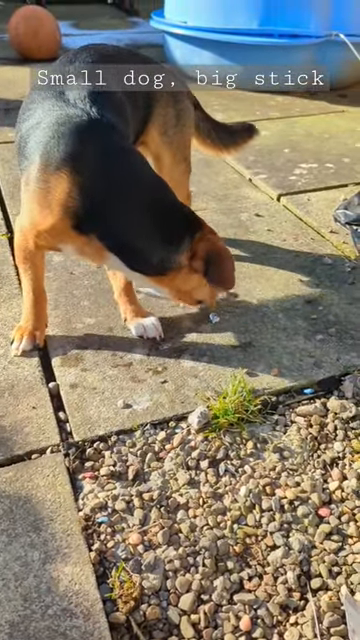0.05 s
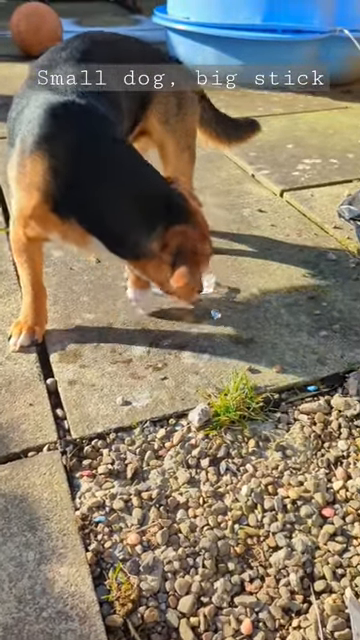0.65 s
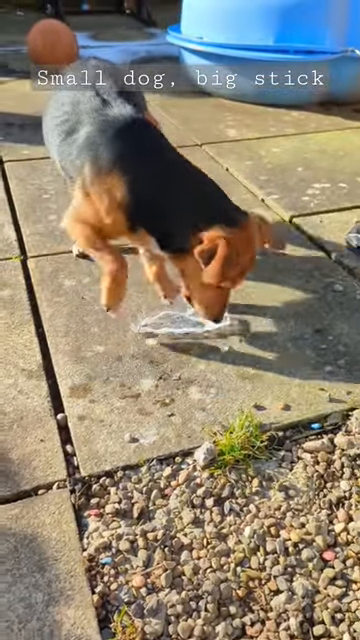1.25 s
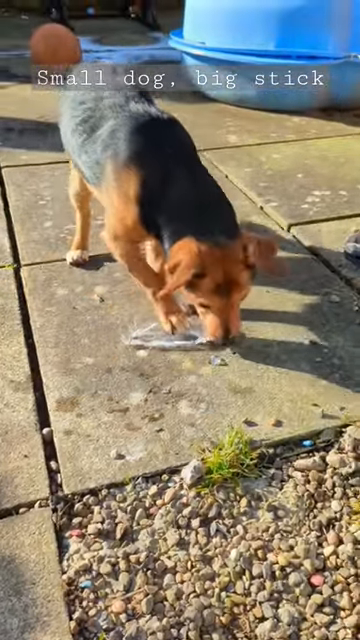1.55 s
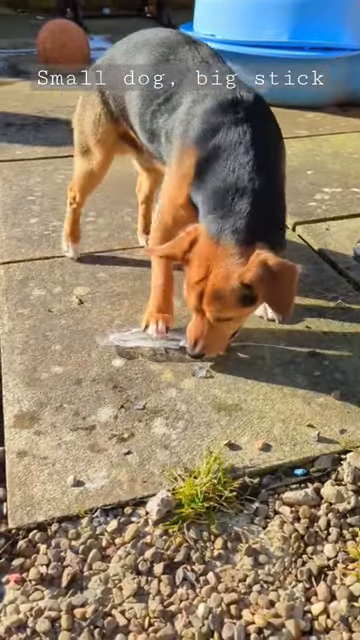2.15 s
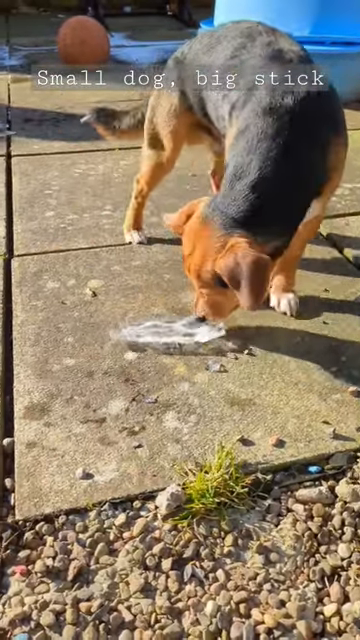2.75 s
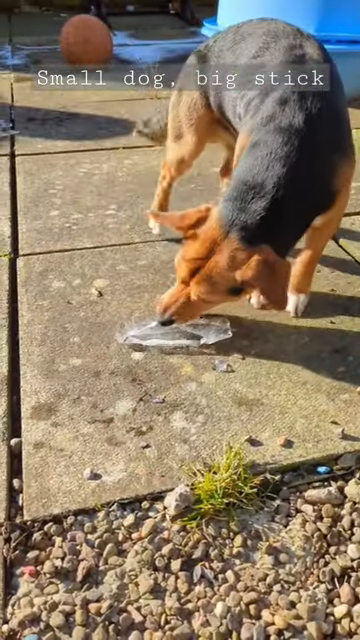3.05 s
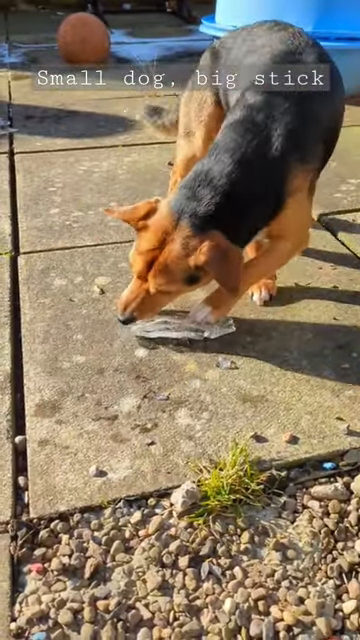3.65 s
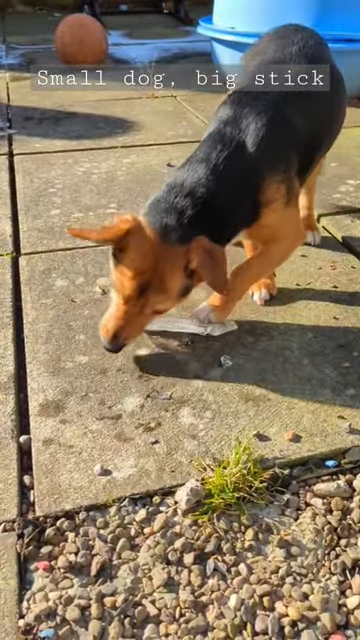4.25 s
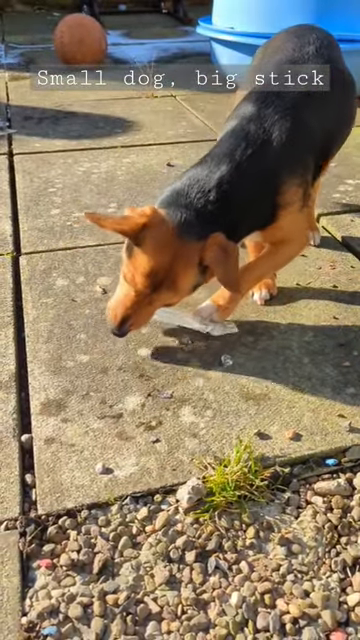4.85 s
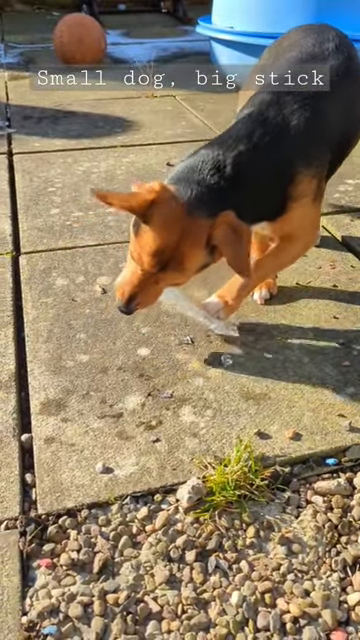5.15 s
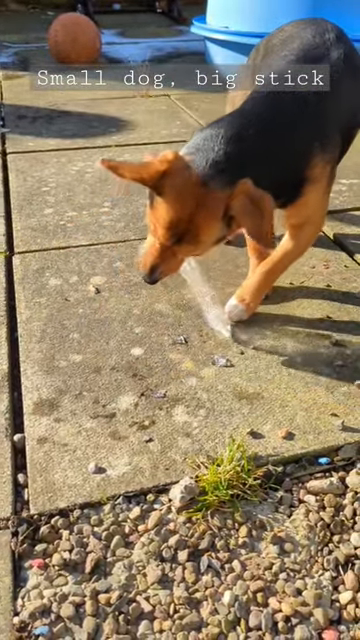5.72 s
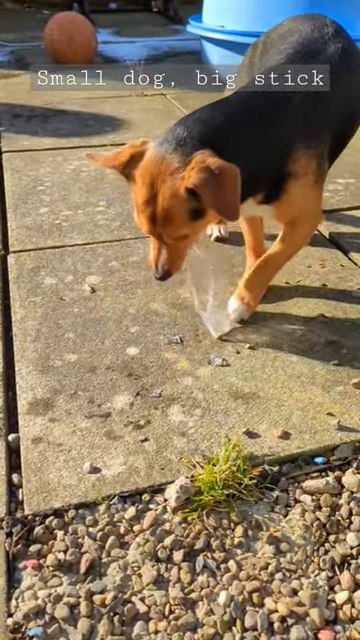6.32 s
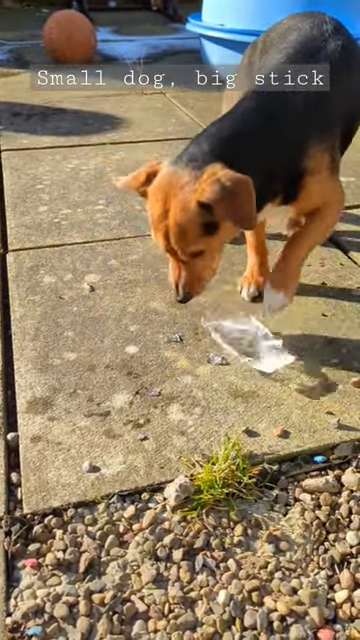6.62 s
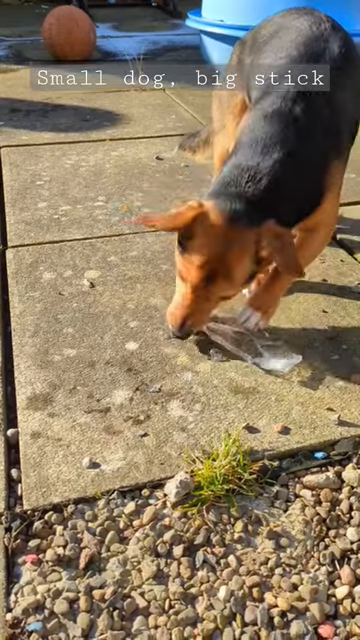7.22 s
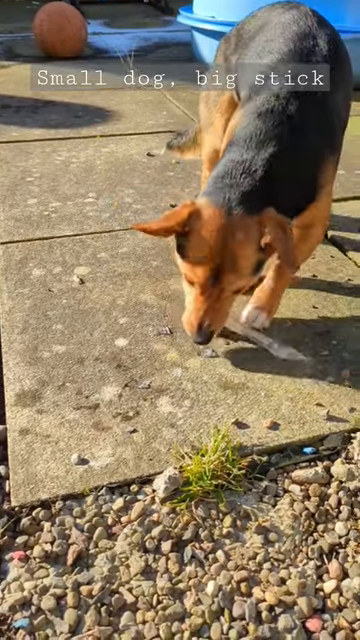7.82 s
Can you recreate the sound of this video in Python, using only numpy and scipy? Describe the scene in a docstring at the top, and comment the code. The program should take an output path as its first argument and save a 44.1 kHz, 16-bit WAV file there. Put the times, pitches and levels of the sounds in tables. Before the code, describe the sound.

A small dog paws a piece of ice across outdoor paving, making close gritty scrapes, brief squeaks and sharp ticks of claws and teeth. The ice topples and clinks to rest twice, once early and again, louder, near the end. Between the two come a few soft thumps of wind on the microphone and light gnawing. Faint bird whistles and a far engine's hum lie behind, the hum dropping away midway.

```python
"""A slab of ice on concrete paving, nosed and pawed by a small dog close to a stereo microphone.
The slab grates over grit, squeaks and twice tips over and clinks to rest, ringing in its own modes;
claws and teeth tick on it. Wind or handling makes soft low bumps, mostly on the left.
Far off an engine drones in rumble and hiss, a background that is turned down in the middle
and comes back; a bird whistles faintly."""
import sys
import numpy as np
from scipy import signal
from scipy.fft import rfft, irfft
from scipy.io import wavfile

SR = 44100
rng = np.random.default_rng(int(sys.argv[2]) if len(sys.argv) > 2 else 0)


def persist_wave(psi):
    """Save psi, clipped to +-1, as 16-bit WAV."""
    counts = np.round(np.clip(psi, -1, 1) * 32767).astype(np.int16)
    wavfile.write(sys.argv[1], SR, np.atleast_2d(counts).T)


N = 347508
T = np.arange(N) / SR


def amp(db):
    """Decibels to gain."""
    return 10 ** (np.asarray(db) / 20)


def unit(x):
    """Scales to rms 1."""
    return x / np.sqrt(np.mean(x ** 2) + 1e-20)


def read(points, hz):
    """Reads a table on a log-frequency axis."""
    f, value = np.transpose(points)
    return np.interp(np.log(hz + 1), np.log(f + 1), value)


def add(mix, s, sound):
    """Mixes a sound in at time s."""
    part = mix[..., max(round(s * SR), 0):][..., :sound.shape[-1]]
    part += sound[..., :part.shape[-1]]


def colour(x, points):
    """Filters by a spectrum, keeping the power of white noise."""
    size = x.shape[-1]
    return irfft(rfft(x) * unit(amp(read(points, np.fft.rfftfreq(size, 1 / SR)))), size)


def drift(hz):
    """A random wander of rms 1, with changes up to about hz."""
    f = np.fft.rfftfreq(N, 1 / SR)
    return unit(irfft(rfft(rng.standard_normal(N)) / (1 + (f / hz) ** 4), N))


def pair(mid, side, width):
    """Left and right from a shared part and a part of opposite sign."""
    return np.array([mid + width * side, mid - width * side]) / np.sqrt(1 + width ** 2)


def noise(size, width):
    """Stereo white noise: mono at width 0, independent sides at 1."""
    return pair(*rng.standard_normal((2, size)), width)


def pan(left_db):
    """Channel gains that put the left left_db above the right."""
    return amp([[left_db / 2], [-left_db / 2]])


# Level of the background (drone, rumble, part of the hiss), turned down in the middle,
# probably by noise suppression: (time [s], level [dB])
BACKGROUND_LEVEL = [(0.0, -42.5), (1.76, -42.5), (2.83, -60.5), (4.59, -66.5), (6.19, -62), (6.41, -44.5),
                    (7.88, -43.5)]
# The far engine's speed: (time [s], cycle rate [Hz])
ENGINE_SPEED = [(0, 17.5), (2, 16.5), (5, 16.5), (7.88, 17)]
# Its harmonics: (multiple of the cycle rate, level [dB])
ENGINE_HARMONICS = [(3, -12.5), (4, 0.5), (6, -10), (7, -11.5), (8, -14), (10, -19), (11, -8), (13, -21),
                    (15, -21.5), (20, -19.5), (28, -23), (36, -23)]
# The rumble around it: (frequency [Hz], level [dB])
RUMBLE_SPECTRUM = [(20, -27), (35, -18.5), (48, -6.5), (70, 0), (130, -0.5), (190, -4), (260, -5.5),
                   (400, -12.5), (700, -17.5), (1500, -67)]


def far_engine(drone_db=-2, rumble_db=-48.5, rumble_follow=.85, loud_db=-42):
    """Far off, an engine's cycles make wavering harmonics in a rumble; both follow the background level."""
    level_db = np.interp(T, *np.transpose(BACKGROUND_LEVEL))
    cycle_hz = np.interp(T, *np.transpose(ENGINE_SPEED)) * (1 + .0069 * drift(6.04))
    cycles = np.cumsum(cycle_hz) / SR
    drone = sum(amp(db + 2.2 * drift(23)) * np.sin(2 * np.pi * (k * cycles + rng.random()))
                for k, db in ENGINE_HARMONICS)
    drone = pair(drone, drone * drift(12), width=.17)  # moving air shifts it from side to side
    rumble = colour(noise(N, width=.28), RUMBLE_SPECTRUM) * amp(1.26 * drift(8))
    rumble *= amp(rumble_db + rumble_follow * (level_db - loud_db))
    return np.sqrt(2) * amp(drone_db + level_db) * drone + rumble


# Open air all around the microphone: (frequency [Hz], level [dB])
AIR_SPECTRUM = [(100, -22.5), (400, 0), (620, -7), (780, -2.5), (1100, -0.5), (1380, 1.5), (1520, 3.5),
                (1680, 4.5), (1900, 0.5), (2100, 1.5), (2900, -9.5), (4500, -14), (6500, -19),
                (9000, -28.5), (15000, -35.5), (16300, -47)]


def outdoor_hiss(calm_db=-61, roar_db=-56, loud_db=-42):
    """A wide, soft hiss, and a duller one that follows the background level."""
    calm = colour(noise(N, width=.95), AIR_SPECTRUM) * amp(.8 * drift(18))
    roar = colour(colour(noise(N, width=1), AIR_SPECTRUM), [(2200, .0069), (6000, -4)])
    sunk_db = np.interp(T, *np.transpose(BACKGROUND_LEVEL)) - loud_db
    return amp(calm_db) * calm + amp(roar_db + sunk_db) * roar


# The free slab's modes, the first four bending it lengthwise: (frequency [Hz], t60 [s], level [dB])
SLAB_MODES = [(1373, 0.15, -.5), (2178, 0.15, -12.5), (3595, 0.098, -13), (4750, 0.044, -1),
              (5170, 0.039, -18), (6290, 0.041, -15.5), (6970, .045, -9), (7470, 0.028, -15),
              (9150, 0.033, -14.5), (10270, 0.042, -16), (12400, 0.037, -14), (14530, 0.021, -7.5)]


def through_ice(force, ring, share):
    """Blends a contact force with the ringing it wakes in the slab; ring scales the decay times."""
    t = np.arange(4096) / SR
    body = sum(amp(.5 * db - 60 * t / (t60 * ring)) * np.cos(2 * np.pi * hz * t) / np.sqrt(t60)
               for hz, t60, db in SLAB_MODES)
    rung = signal.oaconvolve(force, body[None] / np.linalg.norm(body), axes=1)[:, :N]
    return np.sqrt(1 - share) * force + np.sqrt(share) * rung


def high_resonances(ring_db, t60=.03, count=14):
    """A direct click followed by faint ringing at random high pitches."""
    t = np.arange(4096) / SR
    hz = rng.uniform(5000, 15500, (count, 1))
    rings = (np.sin(2 * np.pi * (hz * t + rng.random((count, 1)))) * amp(-60 * t / t60)).sum(0)
    response = (t == 0) + amp(ring_db) * rings / np.linalg.norm(rings)
    return response[None] / np.linalg.norm(response)


def shifting_resonances(x, ring_db, sets=4):
    """Faint, random high resonances colour the ticks and grit, one set fading into another."""
    weights = np.array([amp(20 * drift(9)) for _ in range(sets)])
    return sum(signal.oaconvolve(x * share, high_resonances(ring_db), axes=1)[:, :N]
               for share in weights / weights.sum(0))


def grains(per_s, spread_db, judder_db):
    """Rough points catch and let go: random clicks of uneven size, in clumps."""
    sizes = amp(spread_db * np.minimum(rng.exponential(1, N), 4))
    catches = rng.random(N) < per_s / SR
    return unit(sizes * catches * noise(N, width=.86) * amp(judder_db * drift(90)))


# Ice and claws dragged over the concrete, close by:
# (time of hardest push [s], length [s], grating level [dB], grit against grating [dB])
STROKES = [(.11, 0.23, -67.5, -17), (.66, .12, -69.5, -20), (0.726, 0.075, -67, 13.5),
           (1.036, 0.27, -64, -2), (1.14, 0.15, -48.5, -9), (1.273, 0.12, -50.5, 0),
           (1.364, 0.44, -60, -6.5), (1.635, 0.046, -57.5, 7), (1.84, 0.56, -65, -7),
           (1.948, 0.062, -70, 14), (2.236, 0.3, -67.5, -4), (2.477, 0.083, -70, 9), (2.537, .18, -66, -5),
           (2.749, .1, -71.5, 6.5), (2.88, 0.32, -67, -4.5), (3.672, 0.15, -68.5, -1.5),
           (3.89, 0.12, -75, 5), (4.65, 0.64, -73.5, 3), (4.98, 0.098, -69, 10.5), (5.072, 0.081, -74, 10),
           (5.208, 0.4, -73.5, 4.5), (5.503, 0.17, -72, 14), (5.883, 0.92, -76.5, -1),
           (6.2, 0.67, -71.5, -3), (6.506, 0.09, -52, -.5), (6.579, 0.092, -46.5, 1),
           (6.684, 0.27, -50.5, -4.5), (6.903, 0.14, -58, -2), (7.065, 0.22, -73, 6.5),
           (7.868, 0.51, -55, -1)]
# The grating slab: (frequency [Hz], level [dB])
GRATE_SPECTRUM = [(300, -14.5), (700, 1.5), (1150, 0.5), (1700, -13), (2300, 1), (2900, -3), (3700, -1.5),
                  (5000, -3.5), (7000, -7.5), (8200, -15), (16000, -34)]
# The grit under it: (frequency [Hz], level [dB])
GRIT_SPECTRUM = [(2000, -40), (4200, -7), (5500, 8), (7200, 0.5), (8300, 0), (10500, -2), (14800, -5.5),
                 (16300, -15)]


def scrapes(grate_db=2, crackle_db=-4, swell_share=.4):
    """Each stroke swells and fades; the slab grates, fine grit hisses and coarse grit crackles."""
    slab_push, grit_push = np.zeros((2, N))
    for peak_s, length, slab_db, grit_db in STROKES:
        t, swell_s = np.arange(0, length, 1 / SR), swell_share * length
        push = amp(np.interp(t, [0, swell_s, length], [-12, 2, -12])) * signal.windows.tukey(len(t), .3)
        add(slab_push, peak_s - swell_s, amp(slab_db) * push)
        add(grit_push, peak_s - swell_s, amp(slab_db + grit_db) * push)
    slips = slab_push * grains(per_s=5500, spread_db=-.5, judder_db=4.5)
    slab = through_ice(slips, ring=.55, share=.36)
    fine = grains(per_s=20000, spread_db=2, judder_db=2.2)
    coarse = grains(per_s=290, spread_db=3, judder_db=8)
    grit = shifting_resonances(grit_push * (fine + amp(crackle_db) * coarse), ring_db=-6)
    return amp(grate_db) * colour(slab, GRATE_SPECTRUM) + colour(grit, GRIT_SPECTRUM)


# A bird far off, in the centre: (start [s], length [s], middle pitch [Hz])
BIRD_WHISTLES = [(.02, .14, 4770), (.22, 0.055, 4560), (0.646, .09, 4020), (2.708, .07, 4350),
                 (2.87, 0.05, 5000), (3.39, 0.092, 5530)]


def far_bird(level_db=-74, sag_hz_per_s=900, waver=.025):
    """Thin whistles that sag in pitch, blurred by distance."""
    out, wobble = np.zeros(N), 1 + waver * drift(220)
    for start, length, hz in BIRD_WHISTLES:
        t = np.arange(0, length, 1 / SR)
        pitch = (hz - sag_hz_per_s * (t - length / 2)) * wobble[round(start * SR):][:len(t)]
        add(out, start, signal.windows.tukey(len(t), .5) * np.sin(2 * np.pi * np.cumsum(pitch) / SR))
    return amp(level_db) * out


# Claws and teeth on the ice, close by: (time [s], level [dB], treble tilt [dB])
SNAPS = [(0.078, -48, -31), (.2044, -53, -9), (0.634, -50.5, -25), (0.7777, -41, -6), (.9256, -37, -17),
         (1.0186, -38.5, -48), (1.151, -30.5, 0), (1.8644, -45, -6), (1.9445, -53, -2), (2.13, -49, -3),
         (2.4573, -39, 18), (2.5012, -44, -2), (2.569, -38, 4), (2.7583, -39.5, -2), (3.397, -50, -2),
         (3.645, -39, 7), (4.0956, -39, -12), (4.629, -34, 16), (4.8456, -46, 2), (4.955, -34, 3),
         (4.97, -40, -5), (5.0405, -30.5, -2), (5.1697, -43, 8), (5.3007, -47.5, -6), (5.49, -32.5, 14),
         (5.614, -48, 1), (5.7646, -44.5, -7), (5.851, -41.5, -4), (5.8845, -45, 6), (5.946, -43.5, -1),
         (5.9786, -39, -9), (6.0103, -44.5, -3), (6.117, -45, 3), (6.1932, -41.5, 8), (6.325, -40.5, 1),
         (6.4525, -40, -9), (6.658, -24, 13), (6.676, -23, 7), (6.9566, -41, 4), (7.06, -35.5, 5),
         (7.6304, -41.5, -9)]
# The colour they share: (frequency [Hz], level [dB])
SNAP_SPECTRUM = [(1000, -32), (2800, -10), (4000, 0), (5300, 1.5), (7000, 4.5), (8200, -0.5), (10000, -3),
                 (14500, -13), (16300, -18)]


def claws_and_teeth(level_db=-3, centre_hz=5230, spread_oct=.16, skid_db=-8, skid_s=.013,
                    rise_s=.00084, snap_s=.0019, crumble_db=-15, crumble_s=.0063,
                    gnaw_start=5.5, gnaw_s=1.5, gnaws=20):
    """A hard point snaps on the ice at its own pitch, skids and catches once more, more softly."""
    t, out = np.arange(SR // 16) / SR, np.zeros((2, N))
    envelope = (1 - np.exp(-t / rise_s)) * (np.exp(-t / snap_s) + amp(crumble_db) * np.exp(-t / crumble_s))
    gnawing = [(gnaw_start + gnaw_s * (i + rng.random()) / gnaws, rng.normal(-47.5, 1), 6)
               for i in range(gnaws)]
    for s, db, treble_db in SNAPS + gnawing:
        hz = centre_hz * 2 ** (spread_oct * rng.standard_normal())
        for delay, drop_db in [(0, 0), (skid_s * rng.uniform(.28, 1), skid_db)]:
            snap = colour(noise(len(t), width=.39), [(5000, 0), (12000, treble_db)])
            pitched = colour(snap, [(hz / 1.15, 0), (hz, 5), (hz * 1.15, 0)])
            add(out, s + delay, amp(db + drop_db) * envelope * pitched)
    rung = shifting_resonances(through_ice(out, ring=.35, share=.06), ring_db=-9)
    return amp(level_db) * colour(rung, SNAP_SPECTRUM)


def knock(start=.078, level_db=-40, hz=1050, t60=.05):
    """One dull knock close by: a single damped mode."""
    t = np.maximum(T - start, 0)
    return amp(level_db - 60 * t / t60) * np.sin(2 * np.pi * hz * t)


# Drags on the paving that sing roughly: (start [s], end [s], resonance [Hz], level [dB])
SINGING_DRAGS = [(.71, 0.786, 5500, -69), (1.278, 1.305, 4750, -54), (2.457, 2.587, 6950, -57),
                 (3.636, 3.682, 6870, -55.5), (5.469, 5.567, 5100, -52.5), (6.105, 6.52, 6940, -67.5),
                 (6.494, 6.618, 1150, -45.5), (6.567, 6.727, 3750, -48), (7.017, 7.145, 5500, -61)]


def squeaks(bandwidth_hz=450):
    """Uneven slips feed one narrow resonance for the length of a drag."""
    out = np.zeros((2, N))
    for start, end, hz, db in SINGING_DRAGS:
        size = round((end - start) * SR)
        detuning = (np.fft.rfftfreq(size, 1 / SR) - hz) / (bandwidth_hz / 2)
        tone = unit(irfft(rfft(noise(size, width=.97)) / (1 + detuning ** 2) ** .7, size))
        add(out, start, amp(db) * tone * signal.windows.tukey(size, .5))
    slips = unit(amp(4 * drift(45)))
    return out * slips


# The slab striking the paving, close by: (time [s], strength [dB], place [0 end, 0.5 middle],
# most excited frequency [Hz], crack against strength [dB], ring time [share of the free slab's])
BLOWS = [(.8844, -27, .47, 5870, -6, 0.59), (.9105, -29.5, 0.12, 3500, -11, 0.44),
         (.932, -35, 0.51, 2400, -4, 0.1), (1.133, -26.5, 0.31, 3570, -24, 0.36),
         (1.2115, -24, 0.12, 1190, -12.5, 0.23), (1.2185, -14.5, 0.097, 1600, -23.5, .3),
         (1.2437, -13.5, 0.038, 2130, -18, 0.24), (1.2477, -4, 0.071, 4640, -19, 0.56),
         (1.3172, -10.5, 0.076, 3400, -23, 0.27), (1.3812, -25.5, 0.094, 4530, -17, 0.15),
         (1.6274, -27.5, 0.39, 6500, -11, 0.74), (2.571, -35.5, 0.32, 5400, -11.5, 0.73),
         (2.807, -34.5, 0.22, 1700, -26, 0.17), (2.8417, -29, .33, 2400, -18.5, 0.21),
         (3.642, -28, 0.057, 6050, -24, 0.53), (6.4969, -21.5, 0.063, 4340, -28, 0.45),
         (6.54, -21, .065, 5300, -25, 0.48), (6.6109, -8, 0.046, 3860, -36, 0.52),
         (6.645, -23, 0.47, 4100, -15, 0.57), (6.6895, -24, 0.35, 3130, -8.5, 0.52),
         (6.7152, -1, 0.076, 2600, -13, 0.72), (6.725, -6, .25, 2320, -8.5, 0.43),
         (6.7449, -11, 0.46, 2600, -6.5, 0.95), (6.7675, -12.5, 0.024, 1560, -13, 1),
         (6.845, -6.5, 0.19, 3730, -17, 0.46), (6.8925, -7.5, .275, 6000, -28, 0.29),
         (6.911, -26.5, 0.039, 4600, -11, 0.37)]
# The crack at the contact: (multiple of the most excited frequency, level [dB])
CRACK_SPECTRUM = [(.05, -34.5), (.15, -23.5), (.3, -13.5), (.6, 1), (1, -9), (1.35, -0.5), (2.5, -16.5),
                  (5, -21.5), (12, -42)]


def clinks(ring_db=3, node_floor=.015, focus_db=7, support_shift=.007, rise_s=.00022, choke_s=.002,
           crack_db=2, crack_s=.002, grit_db=-19, grit_s=.017):
    """Each blow cracks and rings the modes that move where it lands and suit its hardness."""
    t = np.arange(SR // 4) / SR
    hz, t60, mode_db = np.transpose(SLAB_MODES)[:, :, None]
    k = np.arange(len(SLAB_MODES))[:, None] + 1
    rings, cracks = np.zeros(N), np.zeros((2, N))
    gaps = np.diff([blow[0] for blow in BLOWS] + [N / SR])
    rise = 1 - np.exp(-t / rise_s)
    crush = rise * (np.exp(-t / crack_s) + amp(grit_db) * np.exp(-t / grit_s))  # grit crumbles on
    for (s, strength, place, contact_hz, crack, ring), gap in zip(BLOWS, gaps):
        motion = np.where(k <= 4, np.cos(np.pi * ((k + .5) * place + 1 / 4)), 1)
        level_db = strength + mode_db - focus_db * np.log2(hz / contact_hz) ** 2
        # the more the slab is held, the more its modes shift
        detune = 1 + support_shift * (1 - min(ring, .9)) * rng.standard_normal(hz.shape)
        envelopes = np.hypot(motion, node_floor) * amp(level_db - 60 * t / (t60 * ring))
        modes = envelopes * np.sin(2 * np.pi * hz * detune * t) * rng.choice([-1, 1], hz.shape)
        choke = np.exp(-np.maximum(t - gap, 0) / choke_s)  # the next landing stops the ring
        add(rings, s, modes.sum(0) * rise * choke)
        contact = colour(noise(len(t), width=.78), [(m * contact_hz, db) for m, db in CRACK_SPECTRUM])
        add(cracks, s, amp(strength + crack) * crush * contact)
    return amp(ring_db) * rings + amp(crack_db) * cracks


# The slab landing flat on the paving: (frequency [Hz], level [dB])
SLAP_SPECTRUM = [(80, -10.5), (300, -23.5), (550, 8.5), (800, -10.5), (1300, 2), (3000, -26.5)]


def slaps(level_db=-20, decay_s=.0028, soft_hz=2000, drop_db_per_oct=12):
    """A flat, soft landing also squeezes out a dull puff; a hard corner does so less."""
    t, out = np.arange(SR // 16) / SR, np.zeros((2, N))
    for s, strength, _, contact_hz, *_ in BLOWS:
        puff = colour(noise(len(t), width=.45), SLAP_SPECTRUM) * np.exp(-t / decay_s)
        add(out, s, amp(strength - drop_db_per_oct * np.log2(contact_hz / soft_hz)) * puff)
    return amp(level_db) * out


# Wind or handling at the microphone, mostly on the left:
# (time [s], level [dB], strongest frequency [Hz], left over right [dB])
BUMPS = [(1.631, -37.5, 278, 0), (1.696, -36.5, 162, 14), (1.88, -33.5, 153, 10.5), (1.975, -36, 88.7, 13),
         (2.258, -40, 170, 4), (2.525, -38.5, 227, 14), (2.6, -45, 182, 14), (2.712, -40.5, 215, 7),
         (2.932, -47, 166, 8), (3.045, -46, 190, 12), (3.088, -43.5, 322, 18.5)]


def microphone_bumps(level_db=-3, rise_s=.011):
    """Wind or handling makes soft low puffs without any ring."""
    t, out = np.arange(SR // 4) / SR, np.zeros((2, N))
    envelope = t / rise_s * np.exp(1 - t / rise_s)
    for s, db, hz, left_db in BUMPS:
        spectrum = [(hz / 6, -14), (hz / 2, -1), (hz, 0), (hz * 1.42, -10), (hz * 4, -36), (hz * 10, -70)]
        puff = colour(noise(len(t), width=1), spectrum)
        add(out, s, amp(db) * pan(left_db) * envelope * puff)
    return amp(level_db) * out


# Rustle right at the microphone: (frequency [Hz], level [dB])
PORT_RUSTLE_SPECTRUM = [(40, -16), (120, 11), (280, -1), (450, -16), (800, -37), (3000, -58)]


def rustle(start=2.2, end=3, level_db=-53.5, left_db=7, lumpy_db=3):
    """Wind or a hand at the left port: lumpy low noise that runs on between the bumps."""
    out, size = np.zeros((2, N)), round((end - start) * SR)
    rub = colour(noise(size, width=.95), PORT_RUSTLE_SPECTRUM)
    add(out, start, amp(level_db) * pan(left_db) * rub * signal.windows.tukey(size, .5))
    return out * amp(lumpy_db * drift(26))


def patio(x, wet_db=-21, t60=.099, echoes_per_s=2000, first_echo_s=.006):
    """Walls and fence scatter faint reflections back to the microphone."""
    t = np.arange(SR // 2) / SR
    arrivals = (rng.random((2, len(t))) < echoes_per_s / SR) * (t > first_echo_s)
    echoes = rng.standard_normal((2, len(t))) * arrivals * amp(-60 * t / t60)
    return x + amp(wet_db) * signal.oaconvolve(x, echoes / np.linalg.norm(echoes[0]), axes=1)[:, :N]


# The slab's balance at the microphone: (frequency [Hz], left over right [dB])
PORT_BALANCE = [(500, -1), (2200, -2), (3000, 4), (3600, -3.5), (4200, -3.5), (4800, -11.5), (5700, -15.5),
                (6600, 1), (8000, -2.5), (9300, 2.5), (12000, 0), (16000, 2.5)]
# Its phase there: (frequency [Hz], left lead [rad])
PORT_LEAD = [(200, 0), (1400, .85), (2200, .4), (3600, .1), (4750, 1.3), (6000, 2.3), (9000, 2),
             (12000, 1.2), (16000, 1.2)]


def microphone_ports(x):
    """The two ports hear the nearby slab with different level and phase."""
    hz = np.fft.rfftfreq(N, 1 / SR)
    left = amp(read(PORT_BALANCE, hz) / 2) * np.exp(.5j * read(PORT_LEAD, hz))
    gains = np.array([left, 1 / left])
    return irfft(rfft(x) * gains / np.sqrt(np.mean(abs(gains) ** 2, axis=0)), N)


def scene():
    """Ice and dog close by on the patio, engine and bird far behind."""
    far = far_engine() + outdoor_hiss() + far_bird()
    near = scrapes() + claws_and_teeth() + knock() + squeaks() + clinks() + slaps()
    return far + microphone_ports(patio(near)) + microphone_bumps() + rustle()


def record(dry, edge_hz=16400):
    """The recorder cuts off the highest treble."""
    lowpass = signal.firwin(511, edge_hz, window=("kaiser", 9), fs=SR)
    return signal.oaconvolve(dry, lowpass[None], "same")


dry = scene()
out = record(dry)
persist_wave(out)
```